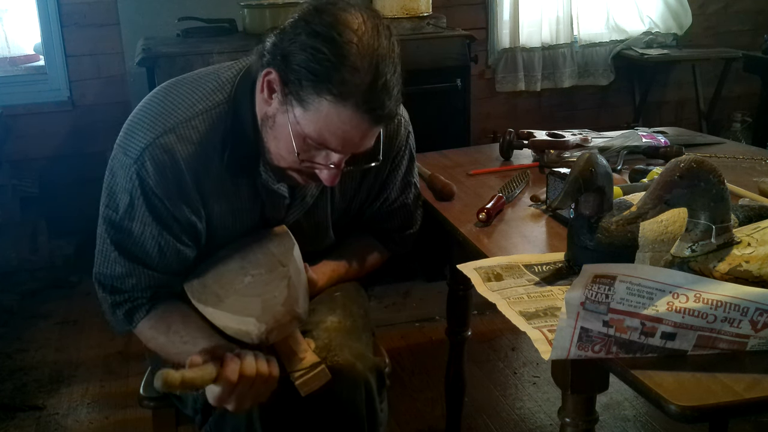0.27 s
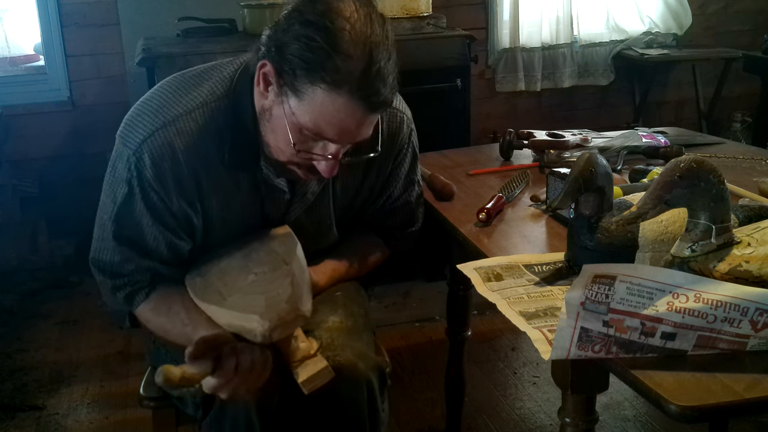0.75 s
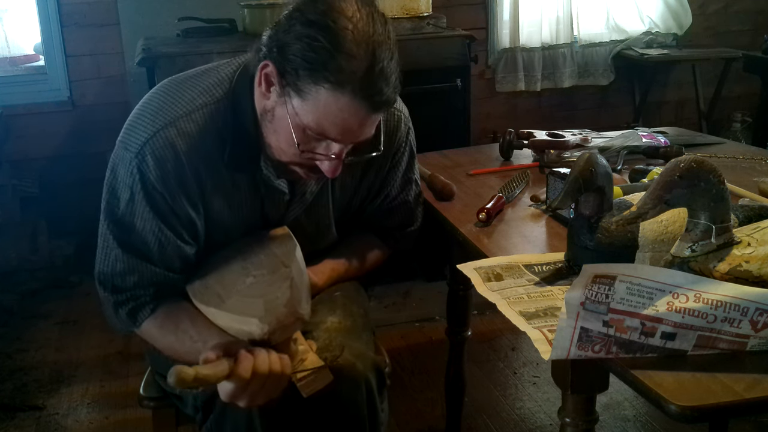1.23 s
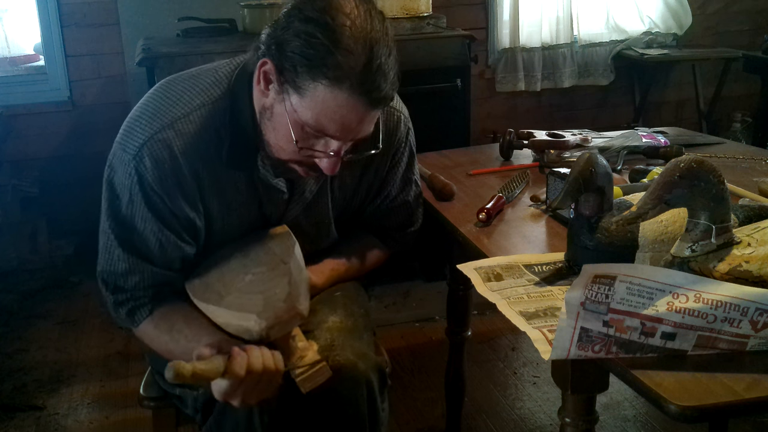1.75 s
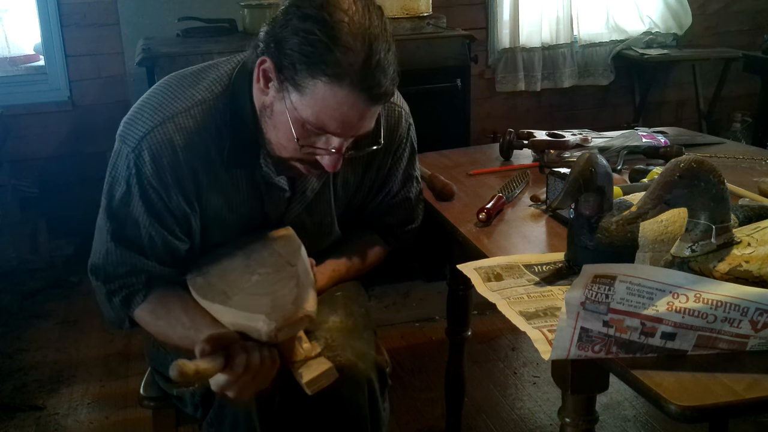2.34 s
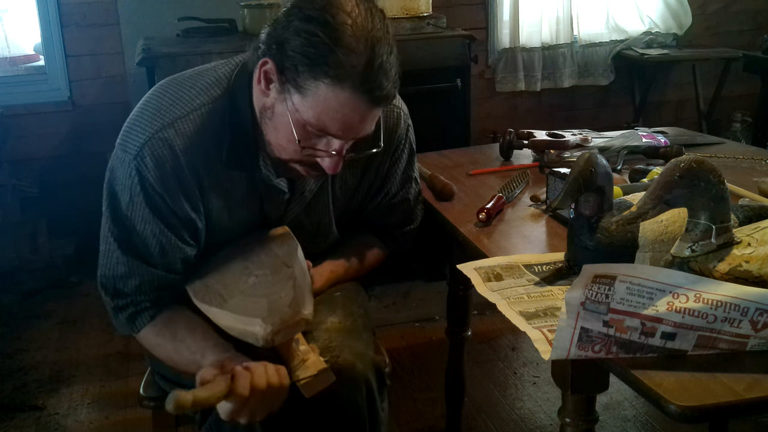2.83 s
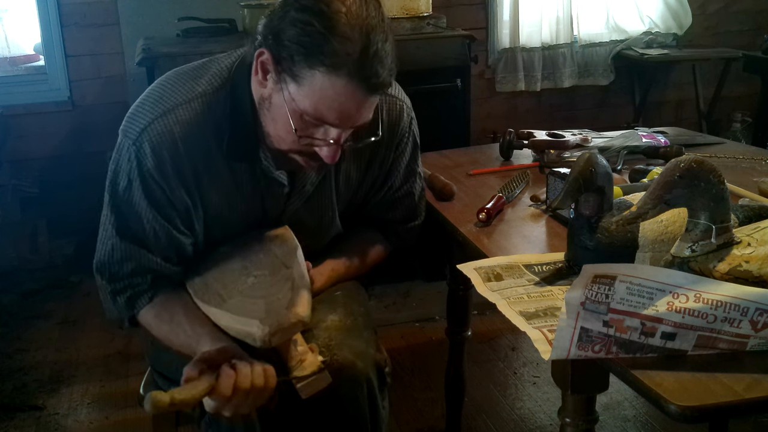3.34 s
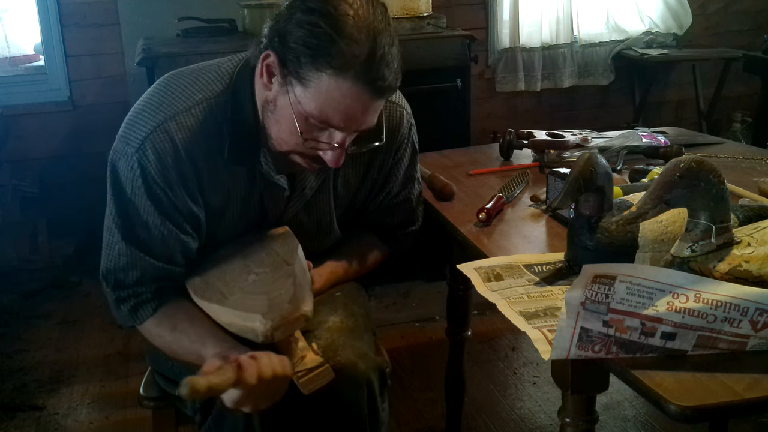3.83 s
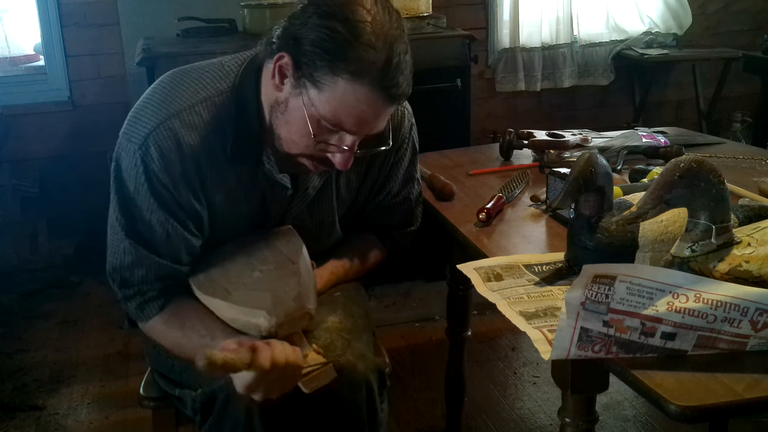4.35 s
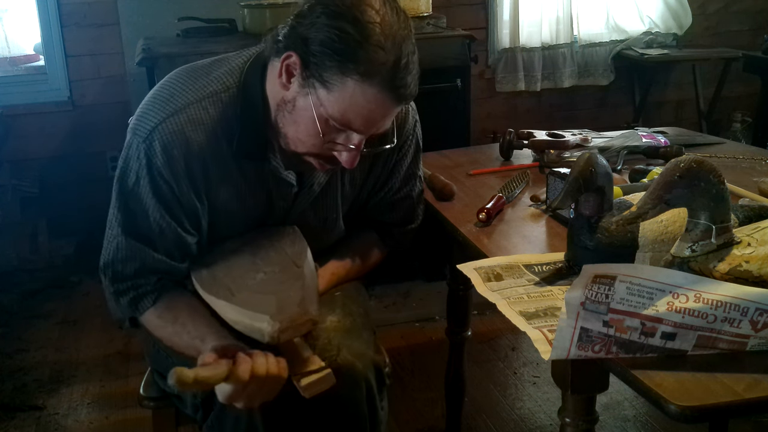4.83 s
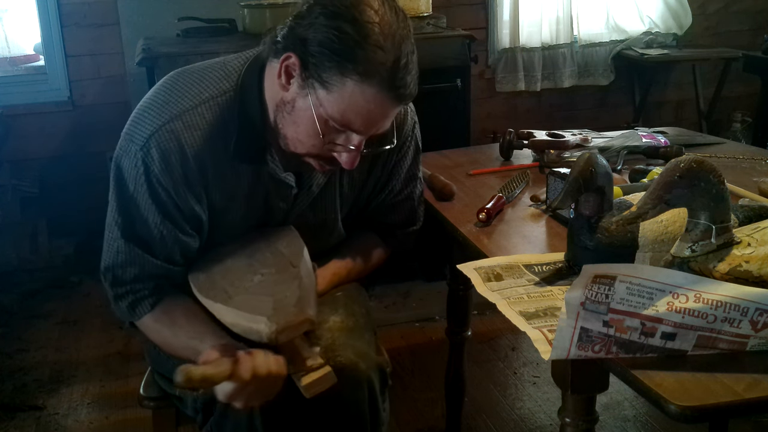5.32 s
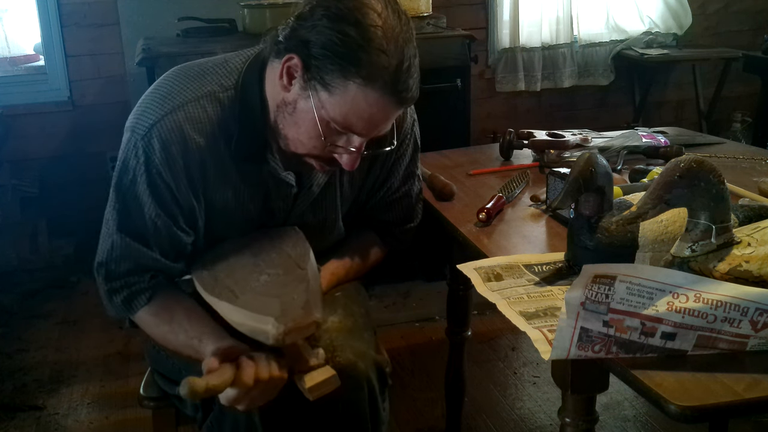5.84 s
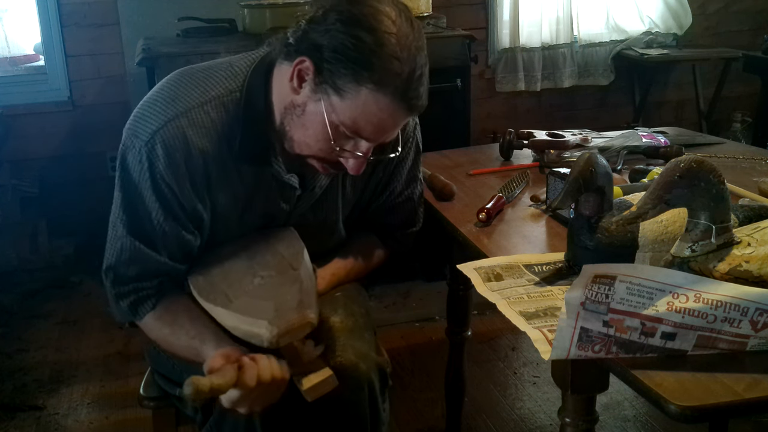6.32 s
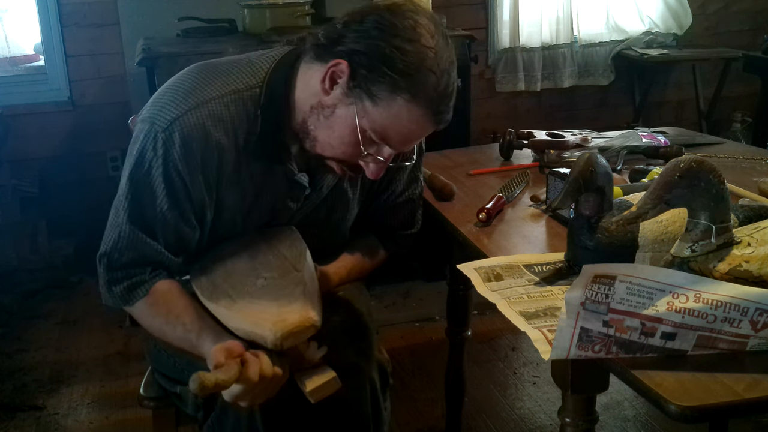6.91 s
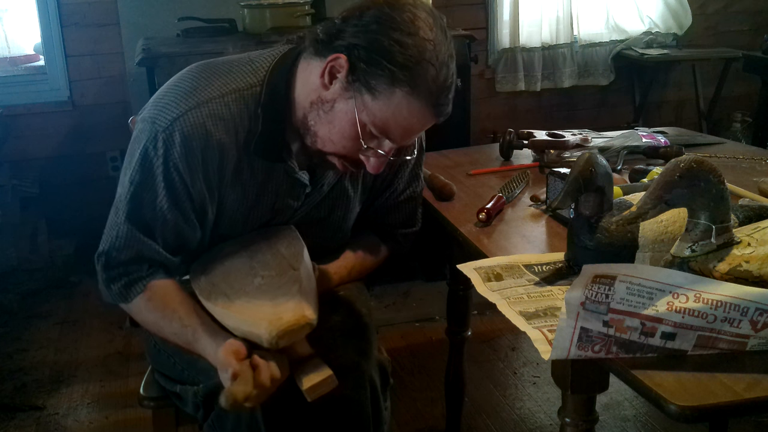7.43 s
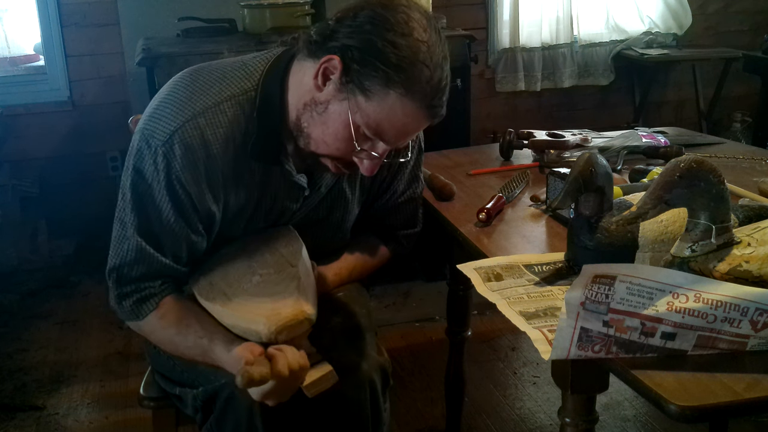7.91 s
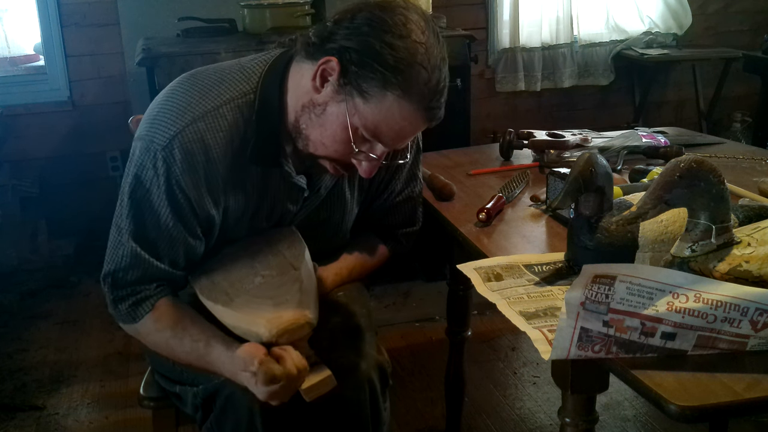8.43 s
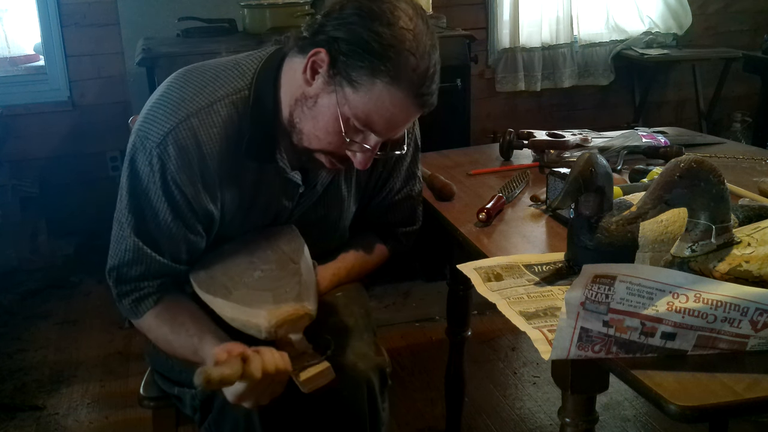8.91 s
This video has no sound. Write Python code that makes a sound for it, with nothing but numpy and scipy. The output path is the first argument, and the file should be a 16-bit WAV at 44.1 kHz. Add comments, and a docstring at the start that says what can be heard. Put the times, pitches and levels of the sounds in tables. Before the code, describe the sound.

Irregular dry scrapes and tiny chip cracks from carving wood by hand, one sharp loud snap partway through, over faint room hiss.

```python
"""Short dry rasps with a papery crackle and a woody ring near 1 kHz: a hand blade pares a wooden decoy.
Trains of tiny fibre breaks drive the resonances of the edge and block and the spectrum of the shaving.
Chips snap as single cracks with a spray of fibres, and one knock rings a few short decaying sines.
Shaped noise makes a skid, a soft sleeve rustle and a steady faint hiss over a low rumble.
A small workroom answers all but the hiss and rumble with brief, diffuse noise tails."""
import sys
import numpy as np
from scipy import signal
from scipy.fft import rfft, irfft, next_fast_len
from scipy.io import wavfile
from scipy.ndimage import map_coordinates

SR = 44100
rng = np.random.default_rng(int(sys.argv[2]) if len(sys.argv) > 2 else 0)


def transcribe(signal):
    """Save signal, clipped to [-1, 1], as a 16-bit WAV file at the path in sys.argv[1]."""
    frames = np.atleast_2d(signal).T
    limited = np.clip(frames, -1, 1)
    pcm = np.round(limited * 32767).astype(np.int16)
    wavfile.write(sys.argv[1], SR, pcm)


N = 403956


def amp(db):
    """Decibels to gain."""
    return 10 ** (np.asarray(db) / 20)


def unit(x):
    """Scale to rms 1."""
    return x / np.sqrt(np.mean(np.abs(x) ** 2) + 1e-20)


def along(points, hz):
    """Read (f/Hz, value) points on a log frequency axis."""
    f, value = np.transpose(points)
    return np.interp(np.log(hz + 1), np.log(f + 1), value)


def wobble(rate, size):
    """A smooth random curve through rate knots a second."""
    knots = rng.standard_normal(int(size * rate / SR) + 4)
    return map_coordinates(knots, [np.arange(size) * rate / SR])


def filtered(x, gain):
    """Shape x by a gain that depends on frequency, without phase shift."""
    padded = next_fast_len(N + SR // 2)
    hz = np.fft.rfftfreq(padded, 1 / SR)
    return irfft(rfft(x, padded) * gain(hz), padded)[:N]


def resonances(modes, hz):
    """Gain of a set of (f/Hz, width/Hz, peak level/dB) resonances, summed in power."""
    power = 0
    for centre, width, db in modes:
        response = hz * width / (centre * centre - hz * hz + 1j * hz * width)
        power = power + np.abs(amp(db) * response) ** 2
    return np.sqrt(power)


def ring(gain, size=4096):
    """Minimum-phase impulse response with the given gain, scaled to an energy of about 1."""
    spectrum = unit(gain(np.fft.rfftfreq(size, 1 / SR)))
    cepstrum = irfft(np.log(np.maximum(spectrum, 1e-6)))
    # folding the cepstrum forward in time makes the response causal
    cepstrum[1:size // 2] *= 2
    cepstrum[size // 2 + 1:] = 0
    return irfft(np.exp(rfft(cepstrum)))


def add(track, s, sound):
    """Mix a sound into the track from time s."""
    start = max(round(s * SR), 0)
    part = track[start:start + len(sound)]
    part += sound[:len(part)]


def swell(s, rise, fall):
    """Pressure of one stroke peaking at s: a lopsided Gaussian, as its samples and their gains."""
    first = max(int((s - 3 * rise) * SR), 0)
    last = min(int((s + 3 * fall) * SR), N)
    span = np.arange(first, last)
    t = span / SR - s
    return span, np.exp(-(t / np.where(t < 0, rise, fall)) ** 2)


def fibres(rate, scatter_db, clump_db, clump_rate):
    """Random tiny ruptures, rate a second, whose uneven sizes swell in clumps; rms 1."""
    breaks = rng.random(N) < rate / SR
    size_db = scatter_db * rng.uniform(-1.06, 1, N) + clump_db * np.tanh(wobble(clump_rate, N))
    return unit(breaks * rng.choice([-1, 1], N) * amp(size_db))


def ambience(level_db=-60, waver_db=1.0, split_hz=400):
    """Shaped noise: steady hiss above a low rumble that wavers a little."""
    # spectrum of the quiet room: f/Hz, relative level/dB
    air_spectrum = [(12, -68), (20, -11.5), (33, -22.5), (129, -27.5), (161, -26), (266, -31), (452, -33.5),
                    (534, -35), (597, -30), (649, -36.5), (985, -41.5), (1200, -39.5), (2090, -42.5),
                    (2400, -41), (15500, -45.5)]
    air = unit(filtered(rng.standard_normal(N), lambda hz: amp(along(air_spectrum, hz))))
    rumble = filtered(air, lambda hz: 1 / (1 + (hz / split_hz) ** 2))
    hiss = air - rumble
    return amp(level_db) * (hiss + rumble * amp(waver_db * wobble(5.1, N)))


def room(x, build_up=0.0019, count=230):
    """Diffuse echoes as decaying noise tails, a fresh one for each of count slices of the sound."""
    # decay of the workroom: f/Hz, time to fall 60 dB/s
    decay_times = [(500, .3), (1000, .3), (3000, .29), (6500, .25), (12000, .21)]
    # strength of its echoes: f/Hz, level/dB
    echo_levels = [(600, -1.5), (3000, -1.5), (6500, -1.5), (9000, -5.5), (15000, -4.5)]
    echoes = np.zeros(N)
    hz, t, noise = signal.stft(rng.standard_normal((count, SR // 4)), SR, nperseg=256)
    decay = amp(-60 * t / along(decay_times, hz)[:, None])
    tails = signal.istft(noise * decay, SR, nperseg=256)[1]
    # the echoes thicken over the first milliseconds
    tails = tails * (1 - np.exp(-np.arange(tails.shape[1]) / SR / build_up))
    for part, tail in zip(np.array_split(np.arange(N), count), tails):
        add(echoes, part[0] / SR, signal.fftconvolve(x[part], tail / np.linalg.norm(tail)))
    return filtered(echoes, lambda hz: amp(along(echo_levels, hz)))


def rubs(events, spectrum, grain):
    """One surface slides over another: fine friction under a swell of pressure."""
    track = np.zeros(N)
    surface = ring(lambda hz: amp(along(spectrum, hz)))
    for s, rise, fall, db in events:
        span, pressure = swell(s, rise, fall)
        add(track, span[0] / SR, signal.fftconvolve(amp(db) * pressure * grain[span], surface))
    return track


def skids():
    """The edge slides back without biting, a dry scrape, and the sleeve rustles softly after it."""
    # blade skidding over the wood: t/s, rise/s, fall/s, level/dB
    skid_events = [(3.589, 0.0042, 0.014, -37)]
    # scrape colour: f/Hz, relative level/dB
    skid_spectrum = [(300, -21), (750, -15.5), (1300, -10.5), (2150, -5), (3100, -1), (3800, -10),
                     (4500, -5.5), (5100, -14), (5800, -3.5), (6400, -16), (7700, -23), (16000, -42)]
    # arm drawing back: t/s, rise/s, fall/s, level/dB
    rustle_events = [(3.67, 0.07, 0.049, -61.5)]
    # cloth colour: f/Hz, relative level/dB
    cloth_spectrum = [(60, -5), (170, -11), (350, -2.5), (600, -15), (1500, -10), (5000, -14), (12000, -40)]
    friction = fibres(rate=9900, scatter_db=8, clump_db=3.0, clump_rate=240)
    scrape = rubs(skid_events, skid_spectrum, friction)
    return scrape + rubs(rustle_events, cloth_spectrum, rng.standard_normal(N))


def knocks(attack=0.0016):
    """The tool knocks on the block: a blunt contact (attack in s) rings a few short modes."""
    # tool meeting wood: t/s, level/dB
    knock_events = [(3.138, -33)]
    # modes it rings: f/Hz, level/dB, time to fall 60 dB/s
    knock_modes = [(980, -3, .05), (1160, 0, .035), (2900, 1, .02), (3200, -3, .016)]
    track, t = np.zeros(N), np.arange(SR // 5) / SR
    tone = sum(amp(db - 60 * t / t60) * np.sin(2 * np.pi * hz * t) for hz, db, t60 in knock_modes)
    for s, db in knock_events:
        add(track, s, amp(db) * tone * (1 - np.exp(-t / attack)))
    return track


def snaps():
    """A chip lets go: one crack and a spray of last fibres that dies within a few milliseconds."""
    # chips breaking off, thin splinters brighter: t/s, level/dB, tilt/(dB/octave)
    snap_events = [(0.619, -28, 7), (1.2886, -23.5, 9), (1.4024, -30, 10), (2.3096, -27, -3),
                   (3.4009, -8.5, 0), (3.4064, -12, -2), (3.8797, -27.5, -3), (4.9772, -27, 20),
                   (4.9908, -22, 12), (5.044, -28, 23), (5.7977, -23, 16), (5.904, -32, 10),
                   (5.93, -22.5, 8), (6.947, -23.5, 6), (7.3348, -23.5, -3), (7.3443, -19, 4),
                   (7.3502, -15, 4)]
    # colour of a chip: f/Hz, relative level/dB
    chip_spectrum = [(400, -24), (1500, -11), (3200, -5), (4250, -3), (5000, -4), (5600, 1), (6300, 4),
                     (6800, 5), (7300, -3), (7900, -8), (10500, -4), (16000, -12)]
    track, t = np.zeros(N), np.arange(SR // 100) / SR
    splinters = .42 * np.exp(-t / .0008)
    for s, db, tilt_db in snap_events:
        # the tilt acts between 2 and 11 kHz
        chip = ring(lambda hz: amp(along(chip_spectrum, hz) + tilt_db * np.log2(np.clip(hz, 2000, 11000))))
        force = np.where(t == 0, 1, splinters * rng.choice([-1, 1], len(t)))
        crack = signal.fftconvolve(force, chip)
        add(track, s, amp(db) * crack / np.linalg.norm(crack))
    return track


def bite_of(s, rise, fall, db, tilt_db, block_db):
    """One bite of the edge; the shaving crackles more under a keen edge, up to 7 dB/octave of tilt."""
    crackle_db = db - 2 + 1.14 * min(tilt_db, 7)
    return s, rise, fall, db, tilt_db, db + block_db, crackle_db


def contacts():
    """Touches of the blade: peak/s, rise/s, fall/s, rasp/dB, tilt/(dB/octave), block/dB, crackle/dB."""
    # Rasp levels are relative: the mix trims all strokes together.
    # full cuts: t/s, half length/s, rasp level/dB, tilt/(dB/octave), block over rasp/dB
    cuts = [(0.615, 0.014, -45, -2.5, 1.5), (1.411, 0.013, -42.5, -3, 1), (2.309, 0.016, -46.5, -1, 3),
            (4.987, 0.03, -48, .5, -2.5), (5.968, 0.015, -47.5, 1, -0.5), (7.078, 0.0084, -41, 0, 0.5),
            (7.349, 0.0078, -44, -1.5, -12), (8.541, .011, -49.5, -1.5, 4)]
    # nicks, the edge catching and letting go: t/s, fall/s, rasp level/dB, tilt/(dB/octave), block over rasp/dB
    nicks = [(0.482, 0.0077, -45.5, -7, -1.5), (1.289, 0.019, -45, 0.5, -10.5),
             (1.378, 0.013, -46.5, 2, -13), (2.887, 0.041, -54.5, -7, 0.5), (3.138, 0.0049, -43, 0, -2),
             (3.403, 0.013, -36, 1.5, -4), (4.964, 0.013, -48, 1, -1.5), (5.664, 0.026, -55.5, -1.5, -2.5),
             (5.743, 0.045, -50.5, -2.5, -5), (5.797, 0.055, -53, -1, 0), (5.955, 0.012, -51, 18, -10),
             (6.72, .01, -52, -6.5, 0), (6.811, 0.0075, -45, -3.5, -2), (6.948, 0.01, -44.5, -7.5, -5),
             (8.454, 0.019, -54, -4.5, 0.5), (8.505, 0.026, -49, -4.5, 2)]
    # light passes, feeling for the next cut: t/s, half length/s, rasp level/dB, block over rasp/dB
    passes = [(0.525, 0.016, -51, -3), (0.969, 0.035, -59, 4.5), (1.157, 0.087, -58.5, -8),
              (1.766, 0.053, -66.5, 4), (2.106, 0.12, -57, -3.5), (2.658, 0.049, -60.5, 5.5),
              (3.814, 0.083, -63.5, -3), (4.056, .023, -56.5, -5), (4.32, 0.04, -60, 1),
              (4.588, 0.094, -59.5, -10), (5.33, .09, -61.5, 0.5), (5.563, 0.042, -57.5, -5.5),
              (6.263, 0.024, -67.5, 5.5), (6.48, .045, -60, -1.5), (6.634, 0.054, -62.5, -6),
              (7.263, 0.017, -57, -11), (8.318, 0.092, -62.5, -4.5)]
    for s, half, db, tilt_db, block_db in cuts:
        # the edge enters lightly, bites, then leaves dull, dragging on the block
        lead, drag = 1.04 * half, 0.76 * half
        yield bite_of(s - 2.5 * half, lead, lead, db - 8, tilt_db, block_db - 4.5)
        yield bite_of(s, half, half, db, tilt_db, block_db)
        yield bite_of(s + 1.69 * half, drag, drag, db - 7, tilt_db - 6.5, block_db + 1)
    nick_rise = 0.0061  # s
    for s, fall, db, tilt_db, block_db in nicks:
        yield bite_of(s, nick_rise, fall, db, tilt_db, block_db)
    pass_tilt_db, pass_crackle_db = -1.8, -9.5  # dB/octave; dB over rasp
    for s, half, db, block_db in passes:
        yield s, half, half, db, pass_tilt_db, db + block_db, db + pass_crackle_db


def strokes():
    """The blade bites and lets go; tearing fibres drive the edge, the block and the shaving."""
    # low resonances of the block: f/Hz, width/Hz, level/dB
    block_modes = [(657, 66, -3.5), (784, 17, 0.5), (883, 26, 4.5), (986, 48, 5.5), (1180, 19, -3),
                   (1396, 61, -4.5)]
    # resonances of blade and cut: f/Hz, width/Hz, level/dB
    blade_modes = [(1658, 110, 10), (2171, 143, 13), (2450, 40, -26), (2820, 99, 1), (3080, 69, -7),
                   (4140, 37, -7), (4220, 91, 5.5), (4400, 40, -1), (5570, 86, 4.5), (6240, 74, 5),
                   (6610, 60, -20), (6800, 60, -16)]
    # colour of the tearing edge: f/Hz, relative level/dB
    rasp_spectrum = [(300, -33), (600, -2.5), (1300, -5), (2300, -5), (3200, 3.5), (3700, -2), (4400, -0.5),
                     (5100, -1.5), (6600, -0.5), (7100, -7.5), (7700, -18), (16000, -19)]
    # colour of the shaving: f/Hz, relative level/dB
    crackle_spectrum = [(2000, -29), (6000, -0.5), (7700, -6.5), (10300, -0.5), (13000, -9), (16000, -14)]
    track = np.zeros(N)
    rasp = fibres(rate=6000, scatter_db=5.0, clump_db=6.5, clump_rate=420)
    push = fibres(rate=6000, scatter_db=1.5, clump_db=5.5, clump_rate=200)
    crackle = fibres(rate=5000, scatter_db=10.5, clump_db=4.5, clump_rate=500)
    # the block radiates little below its first resonance
    radiation = [(200, -19), (450, -2.5), (600, -2.0), (1300, -4.5), (3000, -12.0)]  # f/Hz, level/dB
    block = ring(lambda hz: resonances(block_modes, hz) * amp(along(radiation, hz)))
    shaving = ring(lambda hz: amp(along(crackle_spectrum, hz)))

    for s, rise, fall, rasp_db, tilt_db, block_db, crackle_db in contacts():
        span, bite = swell(s, rise, fall)

        def edge_gain(hz):
            """A keen cut is bright, a dragging edge dull; the tilt acts from 2.2 to 7 kHz."""
            tilt = tilt_db * np.log2(np.clip(hz, 2200, 7000))
            return amp(along(rasp_spectrum, hz) + tilt) * np.hypot(1, resonances(blade_modes, hz))

        edge = ring(edge_gain)
        layers = (rasp, edge, rasp_db), (push, block, block_db), (crackle, shaving, crackle_db)
        for force, body, db in layers:
            add(track, span[0] / SR, signal.fftconvolve(amp(db) * bite * force[span], body))
    # throughout, the hands rub the block very lightly
    rubbing = amp(-81.5 + 2.9 * wobble(9.1, N)) * push
    return track + signal.fftconvolve(rubbing, block)[:N]


def scene():
    """The carving and its chips, both echoed by the room, over the ambience."""
    carving = amp(-4) * strokes() + skids() + knocks()
    work = carving + snaps()
    return (work + room(work) + ambience())[None]


def record(dry):
    """The recorder cuts everything above its band limit and adds a small constant offset."""
    top_hz, offset = 15850, .0118  # offset as a share of full scale
    return filtered(dry[0], lambda hz: hz < top_hz)[None] + offset


dry = scene()
out = record(dry)
transcribe(out)
```